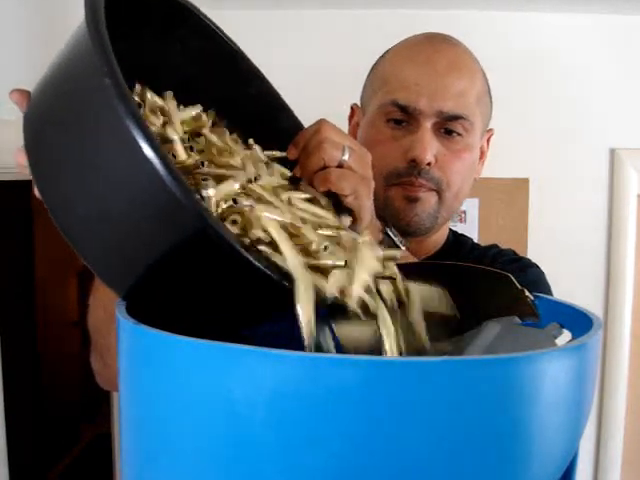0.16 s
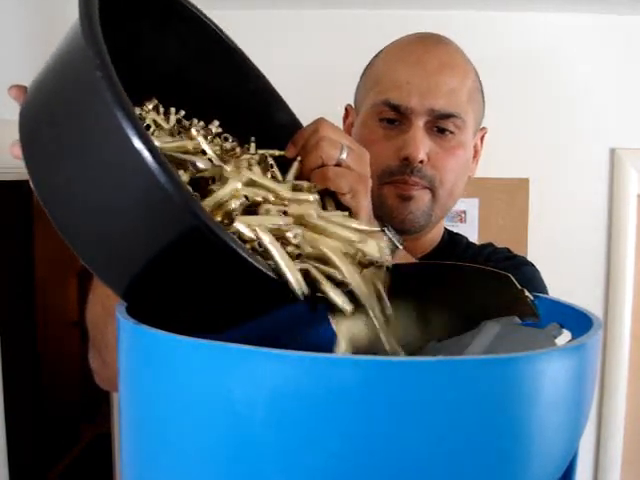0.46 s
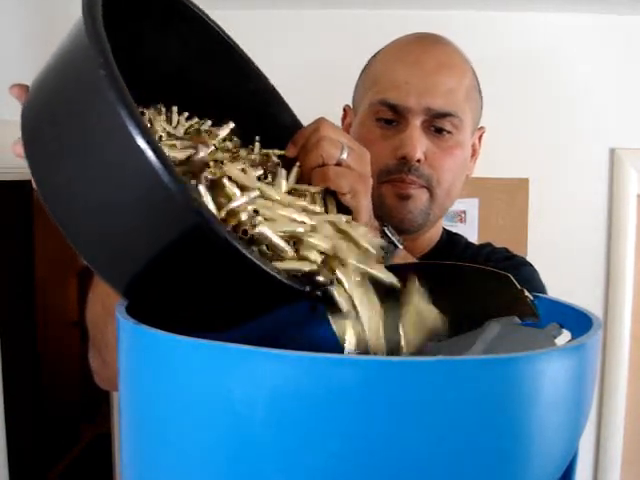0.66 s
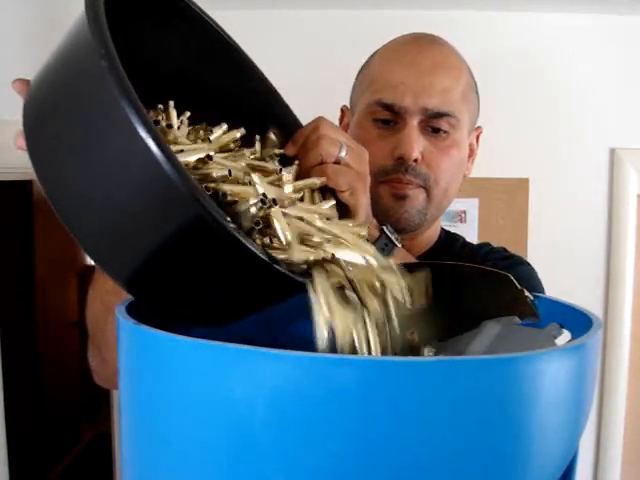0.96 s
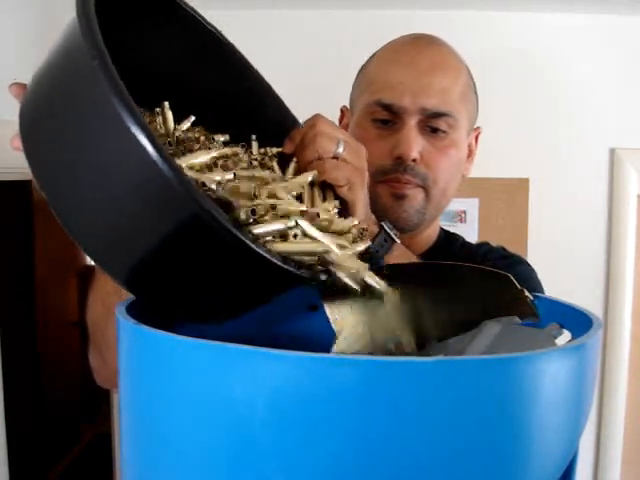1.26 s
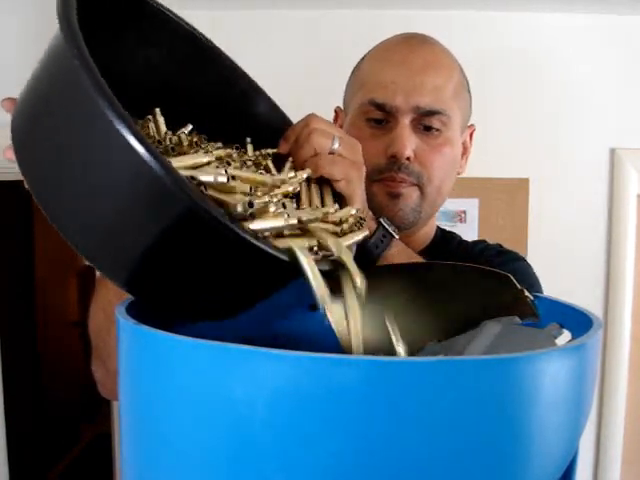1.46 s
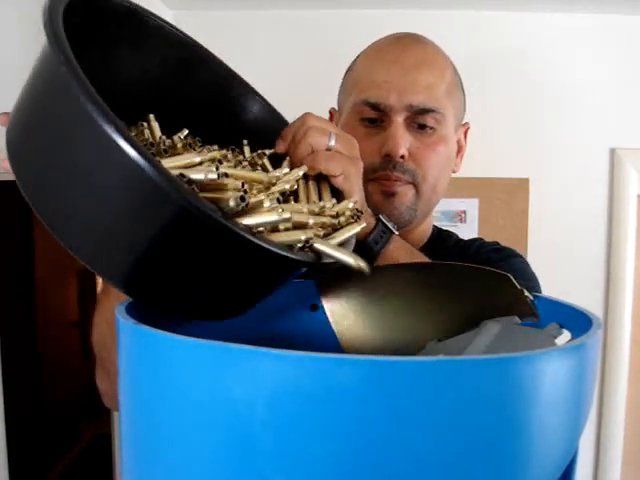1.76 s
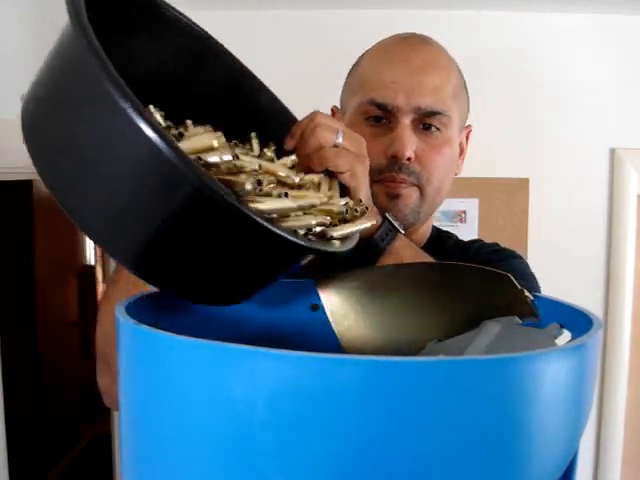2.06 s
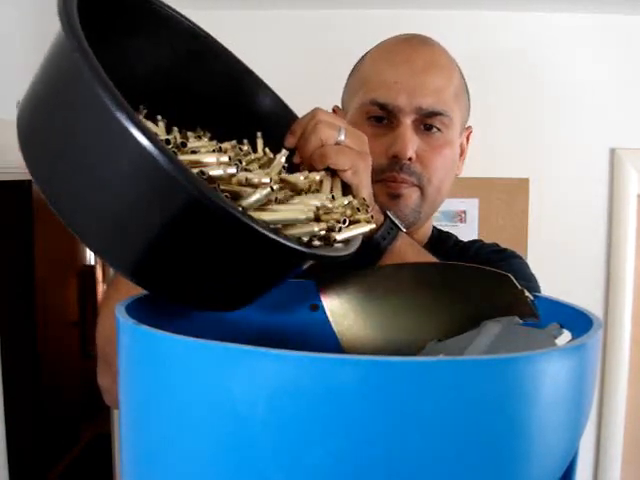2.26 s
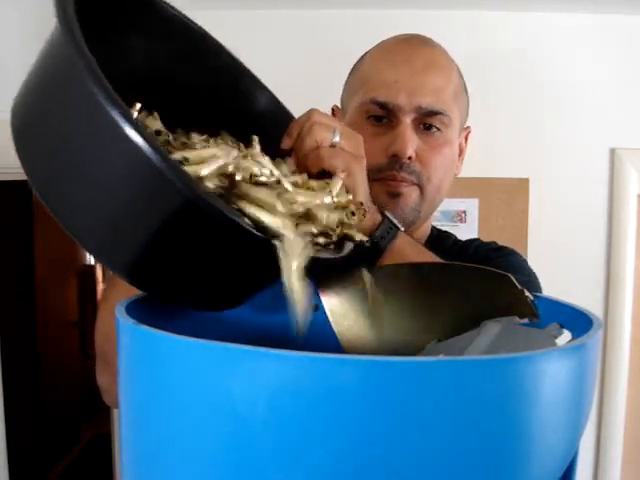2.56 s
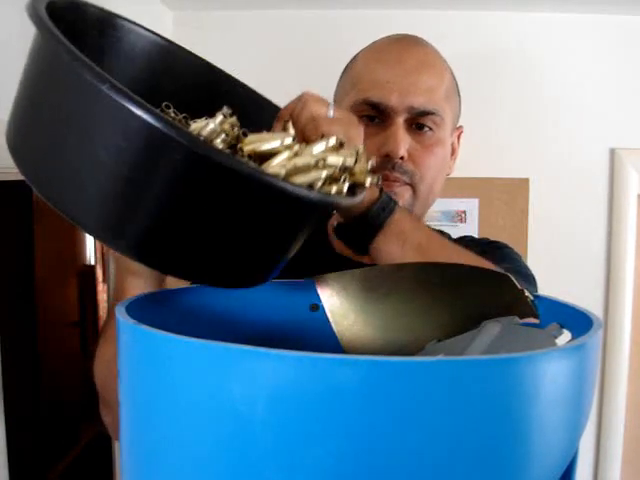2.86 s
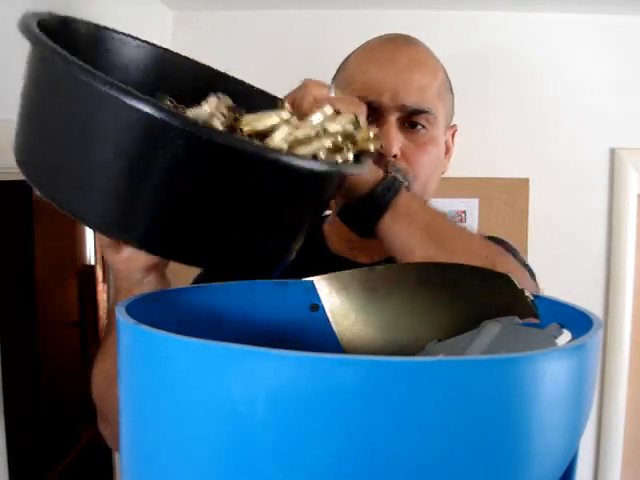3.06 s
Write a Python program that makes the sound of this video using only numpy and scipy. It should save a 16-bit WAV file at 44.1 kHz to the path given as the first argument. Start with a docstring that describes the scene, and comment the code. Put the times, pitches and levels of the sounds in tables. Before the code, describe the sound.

Hundreds of empty brass cases pour from a plastic tub onto a heap in a plastic bowl, a dense bright rattle that thins, stops briefly, shifts and ends in scattered clatters; close microphone, small room.

```python
"""Empty brass cases pour from a tilted plastic tub into a plastic bowl, close by in a small room.
Each landing is a few ms of chatter, made of band-filtered clicks that set short damped modes ringing.
Random small collisions make the dense rattle of the stream and of the pile sliding in the tub.
The stream stops, the pile shifts twice in the tub, and a last handful clatters down;
thumps and hollow clanks of the bowl, reflections and a low rumble complete the scene."""
import sys
import numpy as np
from scipy import signal
from scipy.io import wavfile

SR = 44100
rng = np.random.default_rng(int(sys.argv[2]) if len(sys.argv) > 2 else 0)


def transcribe(signal):
    """Save signal, clipped to [-1, 1], as a 16-bit WAV file at the path in sys.argv[1]."""
    frames = np.atleast_2d(signal).T
    limited = np.clip(frames, -1, 1)
    pcm = np.round(limited * 32767).astype(np.int16)
    wavfile.write(sys.argv[1], SR, pcm)


N = 141120
TIME = np.arange(N) / SR  # s

CHATTER_LOSS_DB = 9.5  # fall in level from the first touch of a case towards its last
COLOUR_SPREAD_DB = 2  # standard deviation in each band: no two cases sound alike
TREBLE_FROM_HZ = 3030  # half of a treble change, in dB, is reached here
SIZE_SPREAD_DB = 2  # how uneven the small collisions are
SMALL_CHATTER_S = .006  # length of a small collision


def from_db(db):
    """Logarithmic level: decibels become an amplitude gain."""
    return 10 ** (np.asarray(db) / 20)


def butter(x, hz, kind, order=2):
    """Causal filtering: a Butterworth response with a maximally flat passband."""
    sos = signal.butter(order, hz, kind, fs=SR, output="sos")
    return signal.sosfilt(sos, x + 1e-18)


def ring(x, hz, t60):
    """Damped resonance: a unit click sets a decaying sine of initial height 1 ringing."""
    radius = from_db(-60 / (t60 * SR))
    angle = 2 * np.pi * hz / SR
    feedback = [1, -2 * radius * np.cos(angle), radius * radius]
    return signal.lfilter([0, np.sin(angle)], feedback, x + 1e-18)


def clicks(s, sizes):
    """Impulsive excitation: clicks of the given sizes at the given times."""
    samples = np.clip(np.ravel(s) * SR, 0, N - 1).astype(int)
    return np.bincount(samples, np.ravel(sizes), N)


def chatter(s, db, length_s, count=18):
    """Repeated impact: a case touches its neighbours many times; times and levels, a row per case."""
    phase = (np.arange(count) + rng.random((len(s), count))) / count
    phase[:, 0] = 0
    touch_s = s[:, None] + length_s * phase
    # the energy is shared among the touches
    touch_db = db[:, None] - CHATTER_LOSS_DB * phase ** 2 - 10 * np.log10(count)
    return touch_s, touch_db


# Ringing modes of the cases and the bowl.
# Each row: frequency in Hz, level in dB before scaling by decay time, decay time t60 in s.
RING_MODES = [(851, -28, 0.049), (1150, -24.5, 0.046), (1530, -31, 0.077), (1674, -18.5, 0.11),
              (1797, -20, 0.068), (2390, -13, 0.017), (2833, -24.5, 0.034), (3557, -9.5, 0.015),
              (4595, -15, 0.083), (7760, -19, 0.013)]


def contacts(s, db, treble_db, colour, count=38):
    """Modal excitation: each row of touches is one case with its own colour, and sets the modes ringing."""
    edges = np.geomspace(90, 17000, count + 1)
    centres = np.sqrt(edges[1:] * edges[:-1])
    colour_hz, colour_db = np.transpose(colour)
    gains = from_db(np.interp(np.log(centres), np.log(colour_hz), colour_db))
    # only the shape of the colour counts: the bands together have unit energy
    gains /= np.sqrt(np.sum(gains ** 2 * np.diff(edges)) * 2 / SR)
    struck = np.zeros(N)
    for low, high, hz, gain in zip(edges, edges[1:], centres, gains):
        case_db = COLOUR_SPREAD_DB * rng.standard_normal((len(s), 1))
        case_db = case_db + treble_db / (1 + (TREBLE_FROM_HZ / hz) ** 4)
        signs = rng.choice([-1, 1], s.shape)
        touches = clicks(s, from_db(db + case_db) * signs)
        struck += gain * butter(touches, [low, high], "band")
    out = struck.copy()
    for hz, level_db, t60 in RING_MODES:
        out += from_db(level_db) * ring(struck, hz, t60) * np.sqrt(2 / (t60 * SR))
    return out


def rattle(level, per_s, colour):
    """Random superposition: small collisions at random moments follow a level curve."""
    chance, size = rng.random(N), rng.exponential(1, N)
    born = chance < per_s / SR
    s = TIME[born]
    db = SIZE_SPREAD_DB * np.minimum(size[born], 3)
    db = db - 10 * np.log10(np.sum(from_db(db) ** 2) / N)  # unit mean power before the curve
    db = db + np.interp(s, *np.transpose(level))
    return contacts(*chatter(s, db, SMALL_CHATTER_S, count=6), 0, colour)


# Level curve of the stream on the heap, before chatter and ringing.
# Each row: time in seconds, level in dB.
STREAM_LEVEL = [(0, -35), (.08, -50), (.15, -25), (.24, -21.5), (.35, -16.5), (.55, -22), (.69, -19.5),
                (.75, -24.5), (.9, -21.5), (1.15, -22.5), (1.28, -22.5), (1.36, -21.5), (1.69, -30),
                (1.78, -22.5), (1.87, -35.5), (2.08, -66), (2.55, -69), (2.66, -23), (2.75, -33),
                (2.85, -54), (2.96, -25), (3.04, -53)]
# Spectral shape of a contact in the bowl, for the stream and the landings.
# Each row: frequency in Hz, relative level in dB per Hz.
BOWL_SPECTRUM = [(100, -27.5), (300, -28.5), (510, -24), (630, -26.5), (770, -9), (1150, -11), (1420, -4.5),
                 (1680, 0.5), (2050, -12), (2900, 0), (3400, -11.5), (3850, -6), (4500, -4), (5600, -10),
                 (7400, -5.5), (8800, -15), (10500, -25.5), (13000, -26), (15500, -19)]


def stream():
    """Random superposition: about 420 collisions per second merge into the rattle on the heap."""
    return rattle(STREAM_LEVEL, 420, BOWL_SPECTRUM)


# Level curve of the pile sliding in the tub, before chatter and ringing.
# Each row: time in seconds, level in dB.
SLIDE_LEVEL = [(0, -32.5), (.3, -28.5), (1.8, -31), (2.05, -40.5), (2.13, -36), (2.16, -27.5), (2.23, -27),
               (2.265, -35.5), (2.37, -31.5), (2.435, -43.5), (2.548, -49), (2.562, -26), (2.62, -18.5),
               (2.67, -22), (2.73, -35), (2.95, -26.5), (3.1, -41), (3.16, -34), (3.2, -55)]
# Spectral shape of a contact in the tub, for the slide and the tumbles.
# Each row: frequency in Hz, relative level in dB per Hz.
TUB_SPECTRUM = [(100, -30), (350, -25), (510, -13), (620, -20.5), (880, -1), (1350, 4), (1950, -2.5),
                (2400, 0), (3200, -1.5), (3800, -7), (4500, -4), (5500, -11), (7700, -8), (10500, -21.5),
                (15500, -20)]


def slide():
    """Random superposition: about 750 collisions per second make the pile's sliding in the tub."""
    return rattle(SLIDE_LEVEL, 750, TUB_SPECTRUM)


def rumble():
    """Low-passed noise: a gentle slope above 33 Hz leaves a faint rumble at -58 dB RMS."""
    noise = butter(rng.standard_normal(N), 33, "low", order=1)
    return from_db(-58) * noise / noise.std()


# Single cases landing in the bowl, before the offsets below.
# Each row: start in seconds, level in dB, treble against the middle in dB.
CASE_LANDINGS = [(0.013, -13.5, -12), (0.032, -7.5, -12), (0.083, -10, -8), (0.097, 1.5, -8.5),
                 (0.127, 2.5, -6), (0.148, 0.5, -7), (0.169, -12.5, 1), (0.195, -9, -4), (0.205, -7.5, -1),
                 (0.22, -9.5, -1), (0.257, -5, -2), (0.269, -2.5, -2), (0.292, -2.5, -6), (0.319, -4.5, -9),
                 (0.341, -2.5, -7), (0.362, 0.5, -7.5), (0.384, -3, -4), (0.426, -7, 1), (0.468, -6.5, -8),
                 (0.521, -4, -6), (0.606, -3.5, -17), (0.657, 0, -13.5), (0.68, -6, -6), (0.698, -8, -3.5),
                 (0.776, -1.5, -8), (0.797, -4.5, -1), (0.81, -9.5, -0.5), (0.864, -4, -5), (0.879, -9, 0),
                 (0.894, -5, -9.5), (0.915, -8.5, -1.5), (0.962, -6.5, -6), (0.985, -4, -12),
                 (0.998, -4.5, -5.5), (1.019, -5, -13), (1.051, -1, -7.5), (1.073, -2, -8.5),
                 (1.094, -4, -4), (1.119, -2.5, -7.5), (1.139, -9.5, -12), (1.168, -6, -2), (1.196, -5, -6),
                 (1.216, -1, -9.5), (1.227, -13, -13), (1.329, -8, 1.5), (1.363, -7, -6), (1.398, -11, -3),
                 (1.43, -3, -1), (1.441, -4, -10), (1.457, -12, 4), (1.508, -4, -19), (1.55, -3, -5.5),
                 (1.567, -6, -8.5), (1.625, -3, -3.5), (1.647, -9.5, -5.5), (1.662, -6.5, -8),
                 (1.702, -12, -16), (1.72, -2, -8), (1.753, -2.5, -11), (1.776, -7, -6), (1.791, -8, -9),
                 (1.813, -13.5, -3), (1.846, -9.5, -7), (1.903, -8, -10.5), (1.926, -4, -6.5),
                 (1.943, -11, -3), (1.958, -16.5, 1.5), (1.989, -8.5, -11.5), (2.012, -11, -22),
                 (2.028, -5.5, -28), (2.037, -18.5, 5.5), (2.764, 1.5, -8), (2.796, -14.5, 1),
                 (2.826, -7, -3.5), (2.85, -3.5, -24), (2.87, -12, 4.5), (2.881, -9.5, 0),
                 (2.932, -3.5, -10), (2.953, -11.5, -3), (2.991, -16.5, -2.5), (3.016, -7, -8.5),
                 (3.048, -13.5, -11.5), (3.068, -14, -12), (3.087, -6.5, -4)]
LANDING_DB, LANDING_TREBLE_DB = 14.5, 4  # added to every row's level and treble
LANDING_S = .0095  # length of one landing's chatter


def landings():
    """Impact excitation: single cases hit the heap in the bowl, each with its own share of treble."""
    s, db, treble_db = np.transpose(CASE_LANDINGS)
    touches = chatter(s, db + LANDING_DB, LANDING_S)
    return contacts(*touches, treble_db[:, None] + LANDING_TREBLE_DB, BOWL_SPECTRUM)


# Heavy landings that push the bowl's wall.
# Each row: start in seconds, level in dB of the fading push before filtering.
WALL_THUMPS = [(0.125, -27.5), (.262, -36), (1.171, -35), (1.579, -37), (1.783, -37), (2.037, -35.5),
               (2.659, -32), (2.765, -38), (2.827, -41), (2.872, -25.5), (2.951, -34), (3.092, -38)]
THUMP_FADE_S, THUMP_HZ = 0.011, 108  # time constant of the fade, low-pass that slows the rise
KNOCK_DB, KNOCK_HZ = -9, 345  # level against the fade, low-pass of the knock


def thumps():
    """Volume displacement: the plastic wall gives, with a one-sided push of air and a dull knock."""
    s, db = np.transpose(WALL_THUMPS)
    decay = np.exp(-1 / (THUMP_FADE_S * SR))
    fade = signal.lfilter([1], [1, -decay], clicks(s, from_db(db)) + 1e-18)
    noise = butter(rng.standard_normal(N), KNOCK_HZ, "low")
    knock = from_db(KNOCK_DB) * fade * noise / noise.std()
    push = butter(fade, THUMP_HZ, "low")
    return knock - push


# Cases tumbling over each other inside the tub, before the offset below.
# Each row: start in seconds, level in dB.
CASE_TUMBLES = [(2.137, -13), (2.157, -8.5), (2.213, -10), (2.228, -16), (2.272, -15.5), (2.305, -17),
                (2.333, -12.5), (2.355, -11), (2.426, -24.5), (2.481, -23.5), (2.533, -27), (2.576, -19),
                (2.608, -5), (2.626, -2), (2.64, -7), (2.661, -2.5), (2.698, -13.5)]
TUMBLE_DB, TUMBLE_S = 14, 0.008  # added to every row's level; length of one knock


def tumbles():
    """Impact excitation: cases topple inside the tub with duller knocks."""
    s, db = np.transpose(CASE_TUMBLES)
    return contacts(*chatter(s, db + TUMBLE_DB, TUMBLE_S), 0, TUB_SPECTRUM)


# Cases that strike the bare wall of the bowl.
# Each row: start in seconds, level in dB before the mode levels, favoured pitch in Hz.
BARE_WALL_HITS = [(2.7645, -8.5, 1310), (2.796, -18.5, 1200), (2.827, -18, 855), (3.016, -25.5, 920),
                  (3.083, -17.5, 1570)]
# Modes of that wall.
# Each row: frequency in Hz, level in dB relative to the hit, decay time t60 in s.
BOWL_WALL_MODES = [(783, 1, 0.024), (1040, 5, 0.012), (1425, 1, 0.024), (1658, 1.5, 0.035),
                   (2450, 5.5, 0.012)]


def wall_hits():
    """Modal selection: the spot a case strikes favours the wall modes near one pitch, a hollow clank."""
    s, db, favoured_hz = np.transpose(BARE_WALL_HITS)
    out = np.zeros(N)
    for k, (hz, level_db, t60) in enumerate(BOWL_WALL_MODES):
        octaves_away = np.log2(hz / favoured_hz)
        sizes = from_db(db + level_db) / (1 + 2 * octaves_away ** 2)
        out += (-1) ** k * ring(clicks(s, sizes), hz, t60)  # neighbouring modes alternate in sign
    return out


ROOM_DB, ROOM_T60_S, ROOM_DULL_HZ = -14, 0.21, 4260  # energy against direct sound, decay, low-pass


def room_response():
    """Diffuse reverberation: dense, dull reflections start after 4 ms and die away exponentially."""
    noise = butter(rng.standard_normal(N), ROOM_DULL_HZ, "low")
    tail = noise * from_db(-60 * TIME / ROOM_T60_S) * (TIME > .004)
    return from_db(ROOM_DB) * tail / np.sqrt(np.sum(tail ** 2))


def scene():
    """Linear superposition: brass sources with their own reflections, plus the dry thumps and rumble."""
    brass = np.zeros(N)
    for source in (stream(), slide(), landings(), tumbles(), wall_hits()):
        reflections = signal.fftconvolve(source, room_response())[:N]
        brass += source + reflections
    return (brass + thumps() + rumble())[None]


def record(dry):
    """Saturation and band limiting: peaks are rounded, then the top is cut above 15.7 kHz."""
    rounded = np.tanh(dry)
    sos = signal.ellip(12, .2, 90, 15700, fs=SR, output="sos")
    return signal.sosfilt(sos, rounded)


dry = scene()
out = record(dry)
transcribe(out)
```